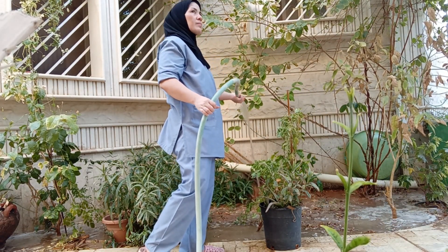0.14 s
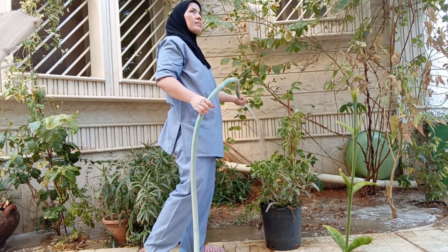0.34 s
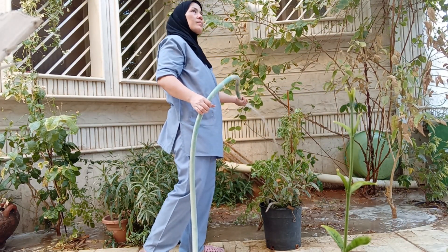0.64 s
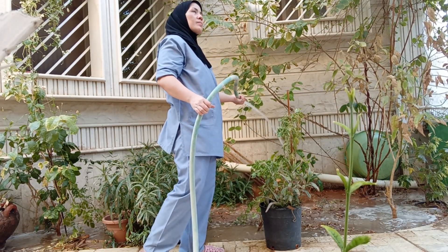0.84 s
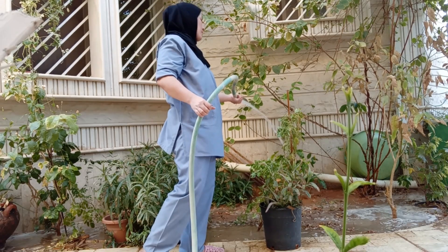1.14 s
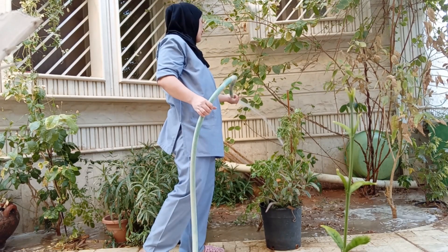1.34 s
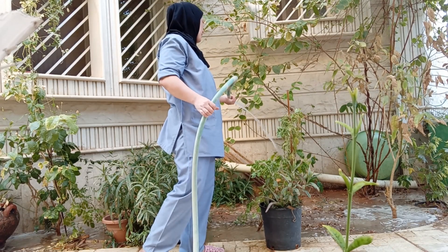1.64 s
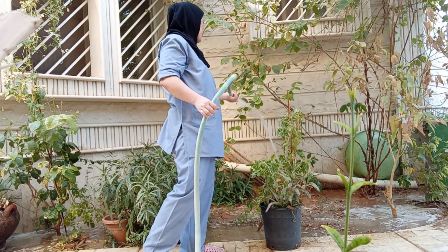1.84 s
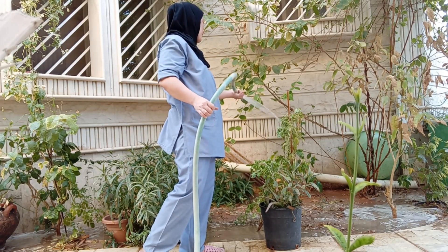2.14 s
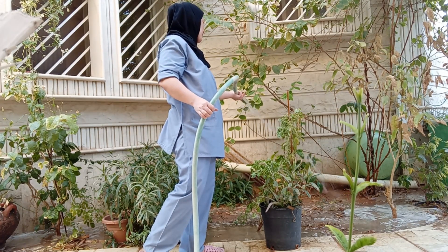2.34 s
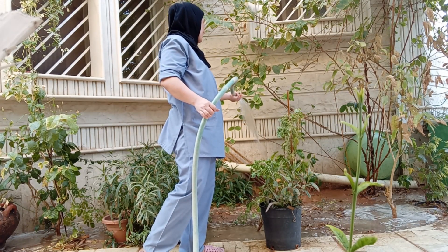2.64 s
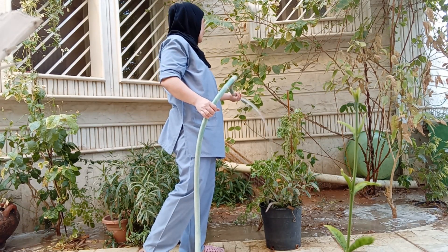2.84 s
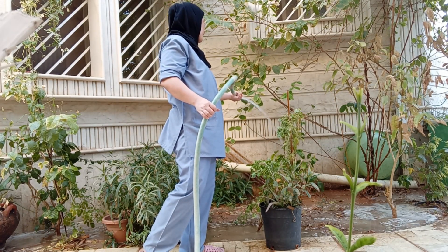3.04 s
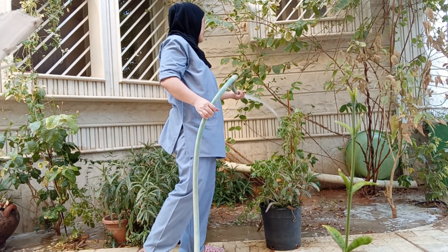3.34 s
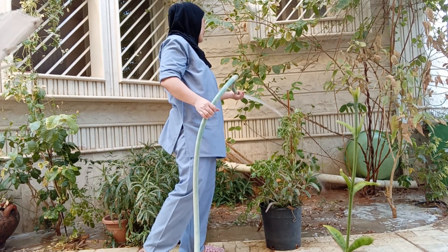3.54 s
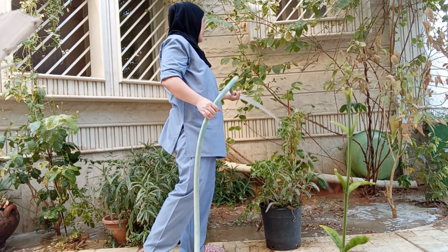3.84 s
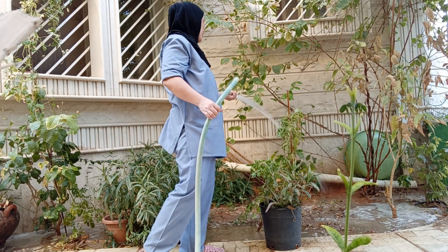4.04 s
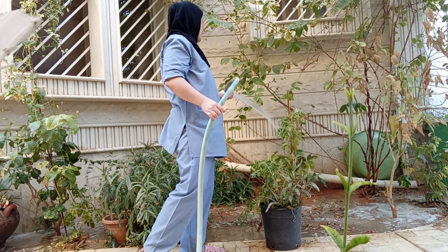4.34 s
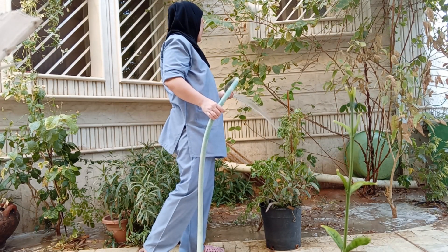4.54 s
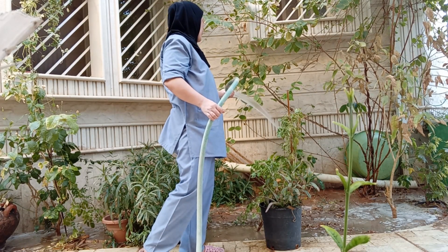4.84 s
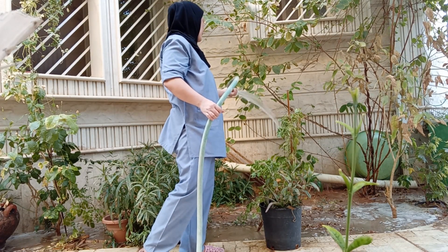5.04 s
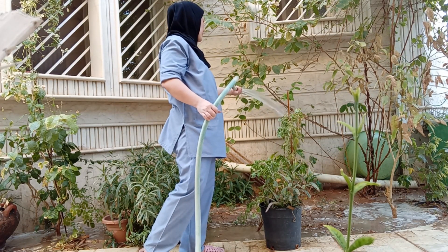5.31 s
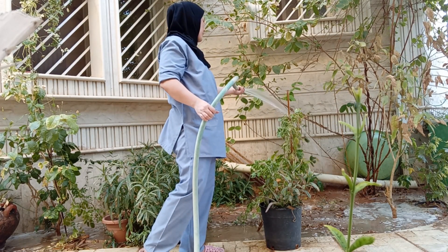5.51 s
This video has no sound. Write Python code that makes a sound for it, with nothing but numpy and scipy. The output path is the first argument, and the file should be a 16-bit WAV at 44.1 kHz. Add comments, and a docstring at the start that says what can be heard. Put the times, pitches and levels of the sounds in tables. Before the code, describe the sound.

A garden hose waters potted plants in a walled yard, a few metres to the right of the microphone. The jet hisses brightly while drops patter on leaves, splash on soil and plink in puddles. At the start a heavy engine drones behind the wall, then fades. Three soft low thuds come near the end, over faint distant traffic and a machine hum.

```python
"""A garden hose waters pot plants in a walled yard, some metres right of a two-port microphone.
The jet hisses; its drops patter on leaves, splash on soil and gurgle in puddles, ringing tiny bubbles
that echo off the walls. A heavy engine drones past behind the wall and fades, something thuds softly
three times, and far off a machine hums amid traffic. The microphone's ports (openings) lift the treble."""
import sys
import numpy as np
from scipy import signal
from scipy.fft import rfft, irfft, next_fast_len
from scipy.io import wavfile
from scipy.ndimage import uniform_filter1d, map_coordinates

SR = 44100
rng = np.random.default_rng(int(sys.argv[2]) if len(sys.argv) > 2 else 0)


def persist_wave(psi):
    """Save psi, clipped to +-1, as 16-bit WAV."""
    counts = np.round(np.clip(psi, -1, 1) * 32767).astype(np.int16)
    wavfile.write(sys.argv[1], SR, np.atleast_2d(counts).T)


N = 250047

# The ports shade each pitch to one side: f/Hz, left minus right/dB
PORT_SHADING = [(1400, -3.5), (2300, 9.5), (3000, -27.5), (3500, 17.5), (5200, -5), (5800, -1)]


def water():
    """The hose jet hisses and breaks into drops that land on puddles, soil and leaves."""
    # The stream sweeps the beds: t/s, soil splash/dB, jet hiss/dB, leaves against soil/dB
    sweep = [(0, -51.5, -53, -4.5), (.8, -51.5, -63.5, -4), (1.0, -49.5, -52, -1.5), (2.1, -49, -53, -1),
             (2.3, -53.5, -47, 4.5), (2.6, -46.5, -47, -0.5), (2.68, -51.5, -54.5, -4),
             (2.85, -52.5, -54.5, -4), (3.1, -53, -50, 3.5), (3.42, -58, -48.5, 2.5), (3.7, -43, -47, -4),
             (4.0, -52, -45, 4.5), (4.15, -46.5, -44.5, -1.5), (4.85, -55.5, -46, 3.5),
             (5.2, -52, -46.5, 0), (5.67, -46.5, -46.5, -3)]
    # Tone colour of each surface and of the jet: f/Hz, relative level/dB
    puddle_colour = [(800, -87), (1100, -10), (1370, 1.5), (1650, -9.5), (2000, -31.5)]
    soil_colour = [(900, -24), (1900, -0.5), (2300, -7), (2800, -0.5), (3500, 3.5), (4400, 1.5),
                   (5200, -11)]
    leaf_colour = [(4000, -6.5), (4800, 3.5), (5900, 3.5), (6800, -0.5), (8000, -15)]
    jet_colour = [(6000, -29), (7200, -4.5), (8200, -12), (10000, -3), (13500, -11.5), (15200, -4),
                  (17000, -6)]
    soil_db, hiss_db, leaf_offset_db = curves(sweep)
    steady_db = np.array([soil_db - 21, soil_db, soil_db + leaf_offset_db, hiss_db])
    puddle_gain, soil_gain, leaf_gain, jet_gain = np.sqrt(amp(2 * steady_db) + surges())
    puddle = patter(puddle_colour, hz=1368, spread=0.14, cycles=12, size_db=3,
                    share=0.4, pan_db=-5, patchy_db=3, count=300)
    soil = patter(soil_colour, hz=3034, spread=0.426, cycles=20, size_db=2.6,
                  share=0.24, pan_db=-1.3, patchy_db=3.4, count=700)
    leaves = patter(leaf_colour, hz=5650, spread=0.14, cycles=24, size_db=3.5,
                    share=0.3, pan_db=-0.5, patchy_db=3, count=1200)
    jet = patter(jet_colour, hz=10500, spread=0.35, cycles=5, size_db=2.4,
                 share=0.1, pan_db=0.1, patchy_db=1.6, count=4000)
    flutter_db = 0.9 * wobble(14) + 1.3 * wobble(35)  # the uneven jet shakes all surfaces at once
    falling = puddle_gain * puddle + soil_gain * soil + leaf_gain * leaves
    landing = amp(flutter_db) * falling + large_drops(droplets=14) + rough_notes()
    sputter_db = 0.5 * flutter_db + 0.8 * wobble(22) + 0.9 * wobble(60)
    hiss = jet_gain * amp(sputter_db) * jet
    lag_s = 0.00014  # the left port hears the water later
    return filtered(landing + hiss, lambda f: np.exp(1j * np.pi * f * lag_s * np.array([[-1], [1]])))


def patter(colour, hz, spread, cycles, size_db, share, pan_db, patchy_db, count):
    """Random drops carry `share` of the power; the rest is a blur of countless tiny ones."""
    when, tuning, size, place = rng.random((count, 4)).T
    pitch = hz * np.exp(spread * (2 * tuning - 1))
    drop_db = -size_db * np.log(1.03 - size)  # many quiet, a few loud
    drops = bubbles(when * N / SR, drop_db, pitch, cycles, pan_db + 6 * (place - 0.5), rise=0.047)
    blur = rush(colour, patchy_db) * amp([[pan_db / 2], [-pan_db / 2]])
    return unit(np.sqrt(share) * unit(yard_echo(drops, echo_db=3)) + np.sqrt(1 - share) * blur)


def surges():
    """Extra power when the stream slaps down harder for a moment: a quick rise, a slower fall."""
    # t/s, fade time/s, level/dB, aim (0 puddle, 1 soil, 2 leaves, 3 jet; fractions blend two)
    slaps = [(.4, 0.35, -56.5, .05), (.825, 0.031, -40.5, 0.96), (.852, 0.081, -41.5, 1.6),
             (.925, 0.012, -36, 2.8), (1.27, 0.043, -42.5, 1.1), (1.15, 0.32, -54.5, .05),
             (1.66, 1, -61, .05), (1.87, 0.44, -52, 0.63), (2.205, 0.023, -49, 1.4), (2.31, 0.1, -42, 0.92),
             (2.332, 0.041, -46.5, .05), (2.61, 0.012, -39.5, 0.87), (2.879, 0.042, -45.5, 0.95),
             (2.941, .03, -42, 1), (3.0, 0.022, -44, 1.3), (3.15, 0.12, -45, 0.77), (3.26, 0.12, -44, 1.5),
             (3.461, 0.045, -44.5, 1.6), (3.815, 0.045, -32, 1), (3.91, 0.027, -58, 2),
             (4.96, 0.33, -50.5, 0.55), (5.221, 0.043, -39.5, 2.43), (5.22, 0.21, -58, .02),
             (5.39, 0.03, -50, 0.87), (5.43, 0.11, -45.5, 1.25), (5.6, 0.31, -45.5, 0.28),
             (5.66, 0.028, -35.5, 0.42)]
    peak_s, fade_s, db, aim = np.transpose(slaps)[:, :, None]
    t = np.arange(0, N / SR, 1 / 1000)
    age = (t - peak_s) / fade_s
    rise = 0.13  # share of the fade time
    swell = amp(2 * db) * np.exp(-2 * np.where(age < 0, (age / rise) ** 2, age))
    power = np.clip(1 - abs(aim - np.arange(4)), 0, 1).T @ swell
    return np.array(curves(np.vstack([t, power]).T))


def large_drops(droplets):
    """Each large drop rings one bubble, then throws a spray of droplets of nearby pitch."""
    # Single drops: t/s, level/dB, f/Hz, loudest spray against the drop/dB
    drops = [(0.1278, -33, 3450, -15), (0.187, -29.5, 5140, -6), (.209, -35.5, 3830, -12),
             (0.5475, -38, 2654, -9), (0.6115, -29, 4260, -19), (0.7335, -41.5, 2410, 3.5),
             (0.7743, -32, 3920, -25), (.773, -36, 3210, -11), (.829, -37.5, 2200, -2.5),
             (.851, -31, 4900, 1), (0.857, -28.5, 5900, -12), (.882, -34.5, 3655, -3),
             (1.217, -42, 3520, -23), (.924, -32, 5250, -3), (1.2685, -36, 6230, 1.5),
             (1.797, -46, 1430, -4), (1.8637, -29, 2435, -28), (1.9415, -37, 3477, 0),
             (1.99, -38.5, 1435, -11), (2.0314, -36.5, 1444, -30), (2.2019, -33, 3440, -5),
             (2.2025, -32.5, 2284, -31), (2.2025, -28.5, 5100, -0.5), (2.3042, -20.5, 5884, -6.5),
             (2.306, -31, 4500, -15), (2.329, -26.5, 4560, -10), (2.3308, -26, 5520, -4),
             (2.3592, -24.5, 5840, -12), (2.384, -34, 2184, -7), (2.3943, -39, 3044, -18),
             (2.61, -37.5, 2170, -9), (2.612, -38, 3577, -21), (2.7303, -23, 1355, -16),
             (2.876, -41.5, 2845, -14), (2.998, -47, 1283, -24), (2.9982, -39, 2206, -4),
             (3.0125, -28, 3250, -15), (3.1687, -37, 2230, -5.5), (3.1837, -38, 2610, -9),
             (3.333, -44.5, 1280, -11), (3.708, -39.5, 2224, -1.5), (3.717, -31, 5740, -1),
             (3.7748, -33, 4660, 5), (3.7944, -34, 2267, 0.5), (3.7993, -27.5, 3430, -9),
             (3.8187, -22.5, 5080, -1), (3.823, -25.5, 3210, -27), (3.831, -27, 5100, -14),
             (3.897, -23.5, 5800, -8), (3.9035, -28, 5790, -28), (3.912, -25, 5720, -8.5),
             (3.947, -22.5, 5900, -21), (3.9614, -24.5, 5700, -14), (4.432, -43.5, 3020, -4),
             (5.218, -25, 5820, -4.5), (5.238, -31.5, 5660, -3), (5.255, -31, 5400, -16),
             (5.369, -36.5, 1255, -6), (5.464, -36.5, 2780, -9), (5.602, -34, 1456, -10)]
    start_s, db, hz, spray_db = np.transpose(drops)
    when, tuning, size, place = np.moveaxis(rng.random((len(hz), droplets, 4)), -1, 0)
    spray_s = (start_s[:, None] - 0.016 * np.log(1 - 0.95 * when)).ravel()
    pitch = (hz[:, None] * np.exp(0.13 * (2 * tuning - 1) ** 3)).ravel()  # most close, a few stray
    droplet_db = ((db + spray_db)[:, None] - 8 * size).ravel()
    pan_db = along(PORT_SHADING, pitch) + 6 * (place.ravel() - 0.5)
    spray = bubbles(spray_s, droplet_db, pitch, cycles=17, pan_db=pan_db, rise=0.015)
    plinks = bubbles(start_s, db, hz, cycles=18, pan_db=along(PORT_SHADING, hz), rise=0.0061)
    return yard_echo(plinks + spray, echo_db=-9)


def rough_notes():
    """Short rough notes in the water: gurgles, whistles and the lingering ring of a drop."""
    # Notes: middle t/s, half length/s, f/Hz, level/dB
    notes = [(0.136, 0.011, 3450, -48), (0.259, 0.038, 2110, -55), (0.444, 0.045, 1254, -55.5),
             (1.0, 0.062, 5670, -56), (1.114, 0.07, 5610, -51), (1.335, 0.034, 6160, -49),
             (1.647, 0.071, 3043, -60), (1.697, 0.034, 1411, -50), (1.92, 0.14, 3603, -53),
             (3.805, 0.099, 1398, -51), (3.833, 0.097, 587, -58.5), (5.09, 0.044, 2180, -50),
             (5.292, 0.12, 1232, -58), (5.502, 0.023, 1460, -54), (5.58, 0.026, 3600, -56),
             (3.685, 0.019, 2260, -51), (3.155, 0.03, 1577, -47.5)]
    track = np.zeros((2, N + SR))
    t = (np.arange(SR // 2) - SR // 4) / SR
    for middle_s, half_s, hz, db in notes:
        note = np.exp(-(t / half_s) ** 4) * rough_tone(2 * np.pi * hz * t, width_hz=0.05 * hz + 50)
        gain = amp(db + along(PORT_SHADING, hz) / 2 * np.array([[1], [-1]]))
        track[:, round(middle_s * SR):][:, :len(t)] += gain * note
    return track[:, SR // 4:][:, :N]


def bubbles(start_s, db, hz, cycles, pan_db, rise):
    """Each bubble swells softly, then dies away as its pitch rises; more cycles ring longer."""
    steps = np.arange(int(np.pi * cycles * SR / hz.min()))
    age = steps / SR * (hz / cycles)[:, None]
    ring = 4 * age * np.exp(-2.8 * age) * np.sin(2 * np.pi * cycles * age * (1 + rise * age))
    at = ((start_s * SR).astype(int)[:, None] + steps).ravel()
    gains = [amp(db + side * pan_db / 2)[:, None] for side in (1, -1)]
    return np.array([np.bincount(at, (ring * gain).ravel(), N)[:N] for gain in gains])


def yard_echo(x, echo_db):
    """The sound plus its echo from the walls, each pitch dying at its own speed."""
    # Echo length: f/Hz, time to fall by 60 dB/s
    fade_times = [(500, 0.069), (2000, 0.21), (8000, 0.14)]
    hz, t, noise = signal.stft(rng.standard_normal((2, SR // 2)), SR, nperseg=256)
    tail = signal.istft(noise * amp(-60 * t / along(fade_times, hz)[:, None]), SR, nperseg=256)[1]
    delayed = np.pad(x, ((0, 0), (300, 0)))
    echo = signal.fftconvolve(delayed, tail / np.linalg.norm(tail[0]), axes=1)
    return x + amp(echo_db) * echo[:, :N]


def engine():
    """A passing engine: its firing tone, overtones at 2, 3 and 6 times that pitch, rumble and tyres."""
    # Engine speed: t/s, firing f/Hz, level of the tone at 3 times that (before a 4 dB cut)/dB
    firing = [(0, 102.3, -56.5), (.6, 104.1, -55), (1.0, 105, -63.5), (1.5, 105.7, -61),
              (2.0, 107.7, -58.5), (2.7, 111.2, -64), (3.6, 115.7, -82), (4.4, 116.5, -67)]
    # The drone swells and sinks as its echoes cross: t/s, level/dB
    drone_levels = [(.03, -53), (.128, -25), (.248, -26.5), (.374, -19.5), (.698, -26), (.836, -42.5),
                    (.976, -47.5), (1.132, -35), (1.6, -45), (2.27, -52), (2.42, -60), (2.73, -46),
                    (2.83, -63), (2.9, -48.5), (3.24, -59), (3.45, -47), (3.55, -56.5), (4.4, -53.5)]
    # The echoes also shift it sideways: t/s, left minus right/dB
    drone_sway = [(0, 2), (.48, 0), (.66, -3.5), (.91, 3), (1.25, -6.5), (1.45, -1.5), (4.4, -0.5)]
    # Tops of the throbbing tone at 6 times the pitch: t/s, level/dB
    throb_tops = [(0, -38), (.45, -55.5), (.86, -54), (1.02, -71), (1.4, -66), (1.55, -57), (1.7, -71),
                  (2.3, -70)]
    # Tone colour of engine rumble and tyre roar: f/Hz, relative level/dB
    rumble_colour = [(30, -4), (60, 0.5), (100, 13), (160, 7.5), (220, -1), (330, -22), (500, -33.5)]
    tyre_colour = [(200, -50), (350, 5), (600, 7), (1000, 1), (1600, -7.5), (2200, -40)]
    t = np.arange(N) / SR
    hz, third_db = curves(firing)
    phase = 2 * np.pi * np.cumsum(hz) / SR
    drone_db = curves(drone_levels)[0]
    sway = amp(curves(drone_sway)[0] / 2 * [[1], [-1]])
    first = np.sin(phase + 0.55 * wobble(6.3))
    second = amp(-29) * rough_tone(2 * phase, width_hz=10)
    drone = amp(drone_db) * sway * (first + second)
    third = amp(third_db - 4) * rough_tone(3 * phase, width_hz=22)
    throb_s, depth_db, settle_s = 0.155, 31, 0.28
    dip_db = depth_db * np.exp(-t / settle_s) * np.sin(np.pi * t / throb_s) ** 2
    sixth_db = curves(throb_tops)[0] - dip_db + 2 * wobble(14) + [[-3], [3]]
    sixth = amp(sixth_db) * np.sin(6 * phase + 1.3 * wobble(23.4) + [[-0.6], [0.6]])
    rumble = amp(drone_db - 13.5) * rush(rumble_colour, patchy_db=1.5)
    tyre_db = -55.5 - 3.25 * t + 6 * np.exp(-t / 0.71)  # the tyres move away, fast at first
    tyres = amp(tyre_db) * rush(tyre_colour, patchy_db=3)
    fade_out = np.clip((firing[-1][0] - t) * 2, 0, 1)
    return fade_out * (np.sqrt(2) * (drone + third + sixth) + rumble + tyres)


def thuds():
    """Three soft blows, each a few low swings shaped like a bubble's ring."""
    # t/s, level/dB, f/Hz
    blows = [(4.455, -32.5, 104), (4.516, -36.5, 104), (4.561, -32.5, 90.6)]
    start_s, db, hz = np.transpose(blows)
    return bubbles(start_s, db, hz, cycles=2.6, pan_db=0, rise=0.01)


def town():
    """Far traffic and the wavering hum of a machine."""
    # Tone colour of the traffic: f/Hz, relative level/dB
    traffic_colour = [(15, -56), (25, -41), (44, -20.5), (102, 2), (145, -5.5), (173, -2.5), (202, -1.5),
                      (514, -10.5), (985, -17.5), (1900, -32.5), (2420, -120)]
    hum_hz, hum_db, traffic_db = 178, -57, -52.5
    hum_gain = np.sqrt(2) * amp(hum_db + 1.5 * wobble(9.7))
    hum = hum_gain * np.sin(2 * np.pi * hum_hz * np.arange(N) / SR + 0.35 * wobble(8))
    return hum + amp(traffic_db) * rush(traffic_colour, patchy_db=1.75)


def rush(colour, patchy_db):
    """Stereo noise of a given tone colour, with random louder and softer patches."""
    # How alike left and right are: f/Hz, likeness (0 to 1)
    likeness = [(100, 0.81), (400, 0.68), (800, 0.039), (1400, 0.018), (3000, 0.03), (7000, 0.032),
                (12000, 0.027)]
    noise = signal.stft(rng.standard_normal((2, N + 512)), nperseg=512)[2]
    patches = uniform_filter1d(rng.standard_normal(noise.shape[1:]), size=3, axis=0)
    patches = unit(uniform_filter1d(patches, size=9, axis=1))
    pair = signal.istft(noise * amp(patchy_db * patches), nperseg=512)[1][:, :N]
    angle = lambda f: np.arccos(along(likeness, f)) / 2
    mid, side = filtered(pair, lambda f: amp(along(colour, f)) * [np.cos(angle(f)), np.sin(angle(f))])
    return unit(np.array([mid + side, mid - side]))


def rough_tone(phase, width_hz):
    """A tone blurred into a narrow band of noise."""
    return wobble(width_hz, len(phase)) * np.sin(phase) + wobble(width_hz, len(phase)) * np.cos(phase)


def wobble(rate, count=N):
    """A smooth curve through `rate` random values a second."""
    values = rng.standard_normal(int(count / SR * rate) + 4)
    return map_coordinates(values, [np.arange(count) * rate / SR])


def filtered(x, response):
    """Scale and delay each frequency f of x by response(f)."""
    size = next_fast_len(N + SR // 2)
    return irfft(rfft(x, size) * response(np.fft.rfftfreq(size, 1 / SR)), size)[..., :N]


def curves(rows):
    """One value per sample for each column after the time."""
    times, *columns = np.transpose(rows)
    return [np.interp(np.arange(N) / SR, times, column) for column in columns]


def along(points, hz):
    """Read a table of (f/Hz, value) at hz, with octaves evenly spaced."""
    f, values = np.transpose(points)
    return np.interp(np.log(hz + 1), np.log(f + 1), values)


def amp(db):
    """Turn decibels into a gain."""
    return 10 ** (np.asarray(db) / 20)


def unit(x):
    """Scale x to an average power of 1."""
    return x / np.sqrt(np.mean(x ** 2) + 1e-20)


def scene():
    """Everything that reaches the microphone."""
    return water() + engine() + thuds() + town()


def record(dry):
    """Each port lifts the treble near its own ringing pitch; the very highest sound is cut off."""
    # Left and right port: f/Hz, width/Hz, boost/dB
    ports = [(10540, 1740, 10.5), (11040, 1370, 14)]
    hz, width, db = np.transpose(ports)[:, :, None]
    top_hz = 15800
    return filtered(dry, lambda f: amp(db / (1 + (2 * (f - hz) / width) ** 2)) * (f < top_hz))


dry = scene()
out = record(dry)
persist_wave(out)
```